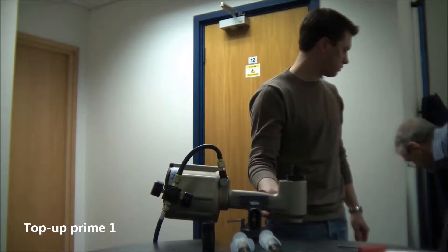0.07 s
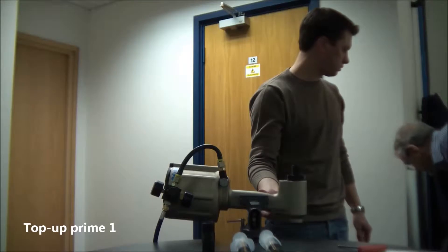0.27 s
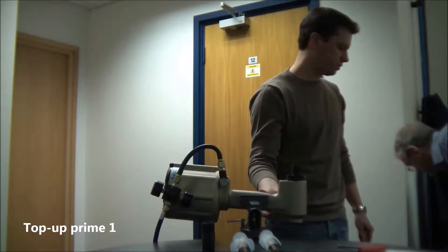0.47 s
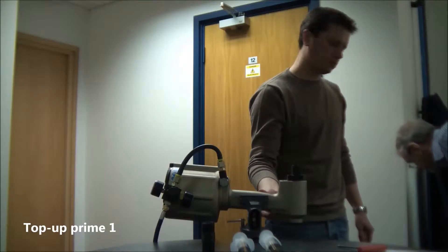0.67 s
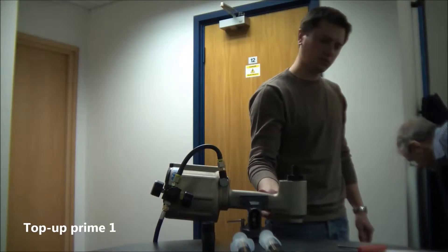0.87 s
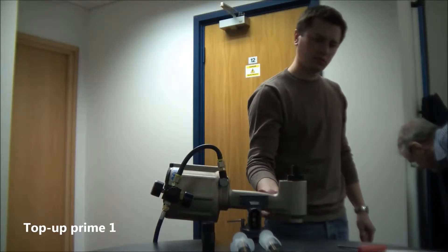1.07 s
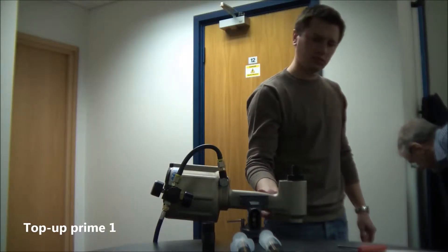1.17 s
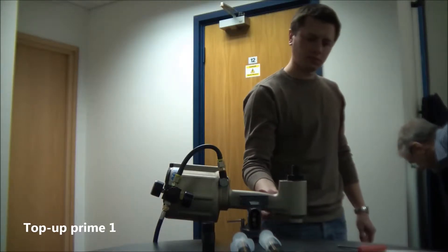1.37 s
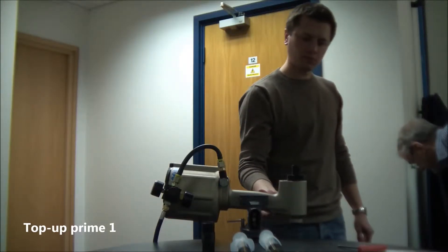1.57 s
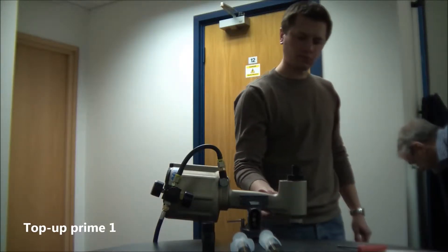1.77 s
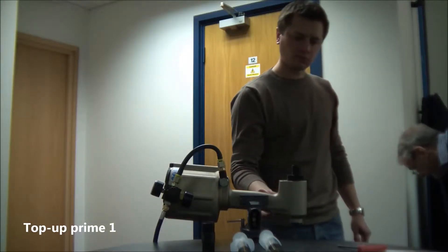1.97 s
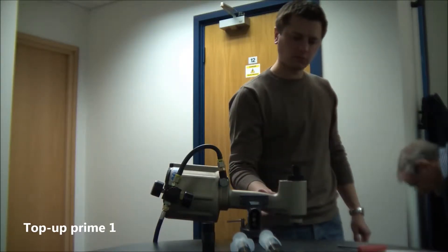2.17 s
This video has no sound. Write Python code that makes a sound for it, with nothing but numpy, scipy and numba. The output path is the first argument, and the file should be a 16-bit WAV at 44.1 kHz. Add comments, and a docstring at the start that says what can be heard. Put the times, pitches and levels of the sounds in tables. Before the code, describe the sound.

Compressed air bursts from a valve with a pop, then a long ringing hiss dies away.

```python
"""A small leak and a mains hum are heard first, in a small office. Then a valve dumps compressed air: a pop, an
overloading blast, and a long hiss that rings in the pipework and dies away unevenly. Leak, hiss and gusts are
coloured or resonated two-channel noise; the pop is decaying sines and the hum one wavering sine.
The camera's gain control ducks everything under the blast, but reacts too late to stop it clipping."""
import sys
import numpy as np
from scipy import signal
from scipy.io import wavfile
from scipy.ndimage import uniform_filter1d
from numba import njit

SR = 44100
rng = np.random.default_rng(int(sys.argv[2]) if len(sys.argv) > 2 else 0)


def generate_wav(signal):
    """Clip the signal to [-1, 1] and save it as 16-bit WAV at the path in sys.argv[1]."""
    frames = np.transpose(np.atleast_2d(signal))
    scaled = np.clip(frames, -1, 1) * 32767
    pcm = np.round(scaled).astype(np.int16)
    wavfile.write(sys.argv[1], SR, pcm)


def volts(x):
    """Linear amplitude factor 10**(x/20) for a level x in dB, scalar or array-like."""
    e = np.asarray(x, float) / 20
    return 10 ** e


N = 97020  # samples, 2.2 s

# Steady leak and room rumble, relative spectrum: pitch_hz, level_db (per Hz)
LEAK_SPECTRUM = [(8, -17), (25, -6.5), (55, -14.5), (85, -10), (150, -18), (300, -18.5), (450, -15.5),
                 (750, -23), (1500, -28.5), (2500, -23.5), (3300, -11.5), (3900, -15), (4600, -21),
                 (6100, -23), (9300, -24.5), (10800, -21), (12000, -27.5), (14700, -35), (15400, -28)]
# Likeness of the left and right microphone signals: pitch_hz, likeness (0 to 1)
STEREO_LIKENESS = [(40, 0.92), (180, 1), (540, 1), (1600, 0.96), (3000, 0.86), (5000, 1), (9000, 0.23),
                   (14800, 0.13)]
# Phase by which the left leads the right: pitch_hz, lead_rad
STEREO_LEAD = [(1500, -0.06), (2800, 0.0064), (4000, -0.62), (5200, -0.96), (10800, -0.85), (14100, 0.32)]
# Left-minus-right balance: pitch_hz, balance_db
STEREO_TILT = [(60, -2), (380, -0.5), (2370, 1), (14800, 0)]
# Narrower gusts within the hiss: start_s, length_s, level_db, starting pitch_hz, width_hz (of each filter pass)
GUST_EVENTS = [(0.202, 0.15, -13.5, 190, 305), (0.211, 0.2, -8.5, 470, 800),
               (0.217, 0.19, -1.5, 4760, 2200), (0.65, 0.22, -6.5, 1830, 60), (0.83, 0.14, -8, 2680, 300),
               (1.077, 0.18, -23.5, 675, 405), (1.169, 0.058, -16.5, 10300, 2440),
               (1.172, 0.21, -17.5, 6830, 600), (1.256, 0.14, -15, 2500, 300),
               (1.187, 0.25, -15, 3480, 620), (1.259, 0.091, -27.5, 71, 90), (1.357, 0.11, -21, 200, 460),
               (1.363, 0.27, -22, 600, 890), (1.44, 0.12, -20, 5300, 900), (1.557, 0.27, -24.5, 444, 510),
               (1.788, 0.22, -23.5, 2070, 1200)]
# Modes of the pop: pitch_hz, relative level_db, t60_s
POP_MODES = [(35, -14, .15), (92, -1.5, 0.058), (200, -14, 0.028), (600, 1.5, 0.023), (1084, -1, 0.019)]
# Course of the venting air, ahead of the gain control: start_s, jet level_db, pipe ring level_db, ring centre_hz
VENT_COURSE = [(.165, -31, -68, 2300), (.185, -20, -28, 2300), (0.21, -19.5, -30, 2300),
               (0.214, -1.5, -6, 2300), (.26, 5, -5.5, 2250), (.31, 2, 2.5, 2400), (.36, -0.5, 2.5, 2340),
               (.42, -2.5, 1.5, 2320), (.55, -5.5, -2.5, 2250), (.68, -9, -4, 2160),
               (.82, -9.5, -4.5, 1840), (.87, -9, -4.5, 2470), (.96, -12, -7, 2470),
               (1.13, -14, -6.5, 2370), (1.24, -15.5, -13.5, 2550), (1.33, -18.5, -15.5, 2960),
               (1.37, -18, -15.5, 3180), (1.52, -17, -15.5, 2500), (1.6, -21, -21, 2900),
               (1.78, -29.5, -27, 2570), (1.87, -29, -23, 2010), (1.98, -33, -26, 2000),
               (2.03, -45, -28, 2370), (2.2, -37, -33, 2300)]
# Open jet, relative spectrum: pitch_hz, level_db (per Hz)
JET_SPECTRUM = [(300, -16.5), (700, -9.5), (1500, -8.5), (2500, -7.5), (4000, -3.5), (5500, 0.5),
                (7000, -4), (8500, -7), (10500, -5), (12500, -9), (15300, -14)]
# Pipe modes: pitch_hz, width_hz (of each filter pass), relative level_db
PIPE_MODES = [(1542, 57, -6), (1645, 95, -0.5), (1797, 105, -0.5), (2093, 100, -3), (2320, 110, -1.5),
              (2450, 126, -5.5), (2648, 143, -4.5), (2917, 170, -3.5), (3422, 250, 2.5), (3637, 220, 2)]
# Broad skirt under the pipe modes, relative spectrum: pitch_hz, level_db
SKIRT_SPECTRUM = [(250, -25), (600, -10.5), (1000, -5.5), (1330, -4.5), (1560, -1.5), (2500, -2),
                  (4000, -4.5), (6000, -24)]


def evened(x):
    """Scales a signal to an rms of one."""
    return x / np.sqrt(np.mean(x ** 2) + 1e-20)


def read(points, hz):
    """Reads a table of (Hz, value) along a log frequency axis."""
    f, value = np.transpose(points)
    return np.interp(np.log(hz + 1), np.log(f + 1), value)


def slow(top_hz):
    """Slow chance of unit rms: sines of random phase over the decade up to top_hz."""
    t = np.arange(0, N, 64) / SR
    x = np.zeros(len(t))
    for f in np.geomspace(top_hz / 10, top_hz, num=20):
        x += np.sin(2 * np.pi * (f * t + rng.random())) / np.sqrt(f)
    return np.interp(np.arange(N) / SR, t, evened(x))


def air(colour):
    """Two-channel noise of a given colour, with drifting patches and the fixed ripple of a small hard room."""
    patch_db, ripple_db = 0.95, 2.5
    hz = np.fft.rfftfreq(2048, 1 / SR)
    a, b, c, d, patches = rng.standard_normal((N // 512 + 5, 1025, 5)).T
    patches = uniform_filter1d(patches, size=24, axis=0)  # over frequency
    patches = evened(uniform_filter1d(patches, size=6, axis=1))  # over time
    ripple = rng.standard_normal((1025, 1))

    same = np.clip(read(STEREO_LIKENESS, hz), -1, 1)[:, None]
    left = a + 1j * b
    right = same * left + np.sqrt(1 - same ** 2) * (c + 1j * d)
    right = right * np.exp(-1j * read(STEREO_LEAD, hz))[:, None]
    tilt = volts(read(STEREO_TILT, hz) / 2)[:, None]

    gain = volts(colour(hz)[:, None] + patch_db * patches + ripple_db * ripple)
    spectrum = np.array([left * tilt, right / tilt]) * gain
    return evened(signal.istft(spectrum, nperseg=2048, noverlap=1536)[1][:, :N])


def resonate(x, hz, width):
    """One resonance: shifts hz down to zero, smooths, and shifts back."""
    turn = np.exp(2j * np.pi * np.cumsum(hz * np.ones(x.shape[1])) / SR)
    r = np.exp(-np.pi * width / SR)
    return 2 * (turn * signal.lfilter([1 - r], [1, -r], x / turn)).real


def office():
    """The steady leak with the room's rumble as coloured noise, and a mains hum that wavers in level."""
    leak_db, hum_db, waver_db, hum_hz = -26, -38, 1, 98.6
    cycles = hum_hz * np.arange(N) / SR + rng.random()
    hum = np.sqrt(2) * volts(hum_db + waver_db * slow(10)) * np.sin(2 * np.pi * cycles)
    leak = volts(leak_db) * air(lambda hz: read(LEAK_SPECTRUM, hz))
    return leak + hum


def gusts():
    """Each gust is noise in one sagging resonance, quick to rise and slower to fade."""
    rise = 0.22  # share of the length
    sag_per_khz = 0.013  # share of pitch lost over the gust, more for high ones
    flat, out = air(np.zeros_like), np.zeros((2, N))
    for start, length, db, hz, width in GUST_EVENTS:
        at = round(start * SR)
        u = np.arange(round(length * SR)) / (length * SR)  # progress, 0 to 1
        pitch = hz * (1 - sag_per_khz * hz / 1000 * u)
        band = resonate(flat[:, at:at + len(u)], pitch, width)
        band = resonate(band, pitch, width)
        shape = np.minimum(u / rise, 1) * np.cos(np.pi / 2 * u ** 2)
        out[:, at:at + len(u)] += volts(db) * shape * evened(band)
    return out


def pop():
    """The valve slams open: a few modes pushed downward at once, each decaying at its own rate."""
    start_s, level_db = 0.2108, 1
    lean = 0.086 * np.array([[-1], [1]])  # share by which modes lean left and right in turn
    t = np.maximum(np.arange(N) / SR - start_s, 0)
    out = np.zeros((2, N))
    for k, (hz, db, t60) in enumerate(POP_MODES):
        mode = volts(db - 60 * t / t60) * np.sin(2 * np.pi * hz * t)
        out += (1 + lean * (-1) ** k) * mode
    return -volts(level_db) * out


def pipe_modes(centre_hz):
    """Pipework ringing: noise in drifting resonances, strongest near a centre that wanders with the flow."""
    spread_octaves, flutter_db = 0.38, 1.2
    wander = 0.006  # drift of each mode, share of its pitch
    flat = air(np.zeros_like)
    modes, power = np.zeros((2, N)), np.zeros(N)
    for hz, width, db in PIPE_MODES:
        nearness = np.exp(-.5 * (np.log2(hz / centre_hz) / spread_octaves) ** 2)
        gain = volts(db + flutter_db * slow(12)) * nearness
        drift = hz * (1 + wander * slow(8))
        mode = resonate(resonate(flat, drift, width), drift, width)
        modes += gain * evened(mode)
        power += gain ** 2
    return modes / np.sqrt(power)


def vent():
    """Compressed air escaping: the open jet, plus the pipe modes over their broad skirt."""
    swell_db = -0.28
    blur_db_per_s = 4  # the skirt gains on the modes as pressure falls
    t, rows = np.arange(N) / SR, np.transpose(VENT_COURSE)
    jet_db, ring_db, centre_hz = (np.interp(t, rows[0], col) for col in rows[1:])
    jet = air(lambda hz: read(JET_SPECTRUM, hz))
    skirt = volts(blur_db_per_s * (t - 1))
    ring = pipe_modes(centre_hz) + skirt * air(lambda hz: read(SKIRT_SPECTRUM, hz))
    ring = ring / np.sqrt(1 + skirt ** 2)
    on = t > rows[0][0]
    return on * volts(swell_db * slow(40.6)) * (volts(jet_db) * jet + volts(ring_db) * ring)


@njit
def follow(want, grab, recover):
    """One-pole follower with separate rising and falling rates, as shares per sample."""
    out, now = np.empty(len(want)), 0.
    for i in range(len(want)):
        now += (want[i] - now) * (grab if want[i] > now else recover)
        out[i] = now
    return out


def scene():
    """Sums office, gusts, pop and vent, with left-minus-right balances in dB."""
    half = np.array([[.5], [-.5]])
    side = volts(-0.45 * half) * (office() + gusts())
    return side + pop() + volts(-0.5 * half) * vent()


def gain_control(dry):
    """The camera's gain control: follows the trailing level of both channels and ducks what exceeds a knee."""
    knee_db, grab_s, recover_s = -19.5, 0.088, 0.14
    squeeze = 0.63  # dB cut per dB above the knee
    power = uniform_filter1d((dry ** 2).mean(0), size=400, origin=199)  # the last 9 ms
    power_db = 10 * np.log10(abs(power) + 1e-12)
    want_db = squeeze * np.maximum(power_db - knee_db, 0)
    cut_db = follow(want_db, 1 / (grab_s * SR), 1 / (recover_s * SR))
    return dry / volts(cut_db)


def low_pass(x):
    """Removes everything above the highest recorded frequency."""
    return signal.sosfilt(signal.butter(12, 15450, fs=SR, output="sos"), x)


def record(dry):
    """The gain control reacts too late for the blast, which clips at a fixed ceiling."""
    ceiling = 0.9  # of full scale
    mix = np.clip(gain_control(dry), -ceiling, ceiling)
    return low_pass(mix)


dry = scene()
out = record(dry)
generate_wav(out)
```